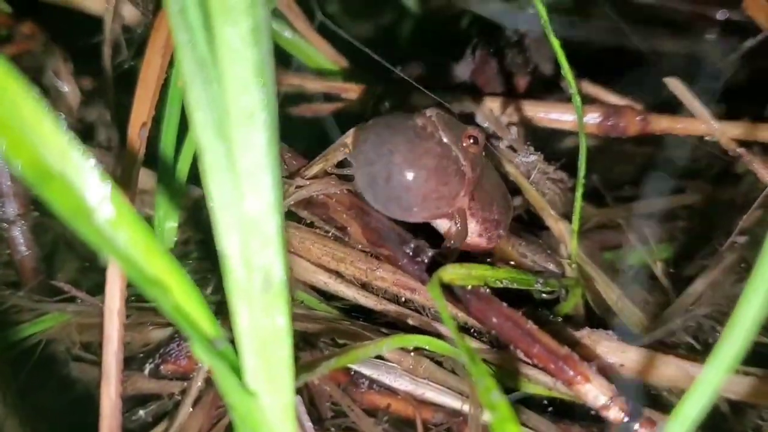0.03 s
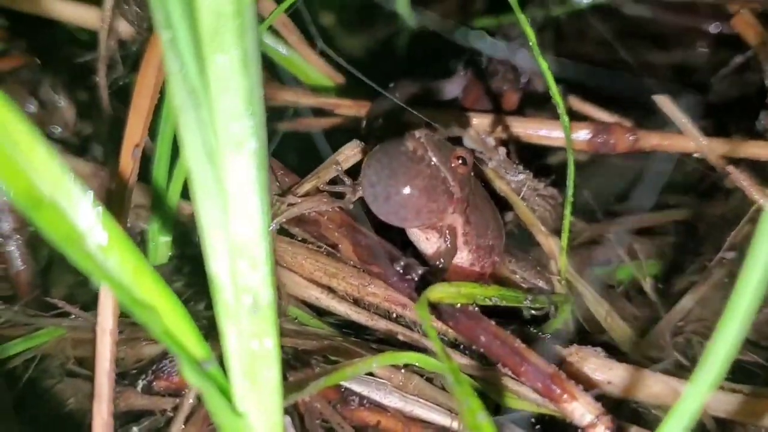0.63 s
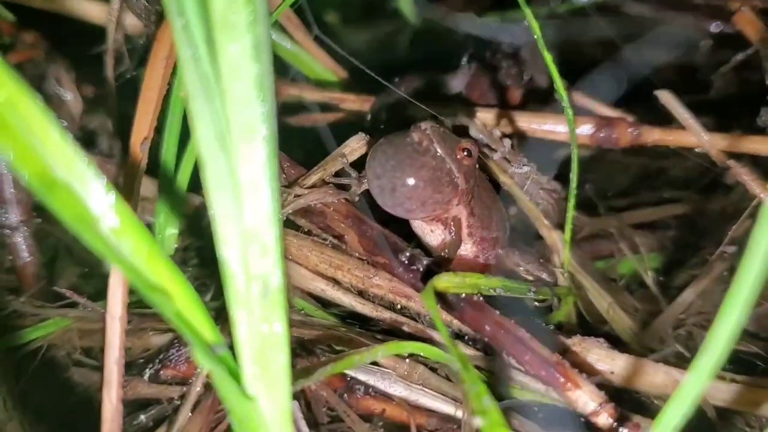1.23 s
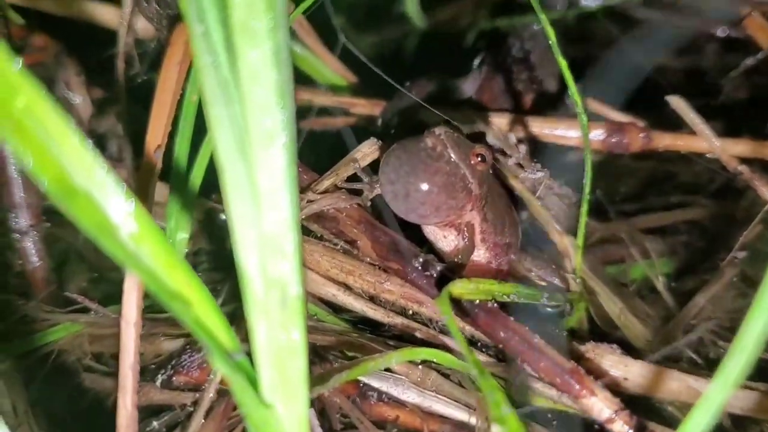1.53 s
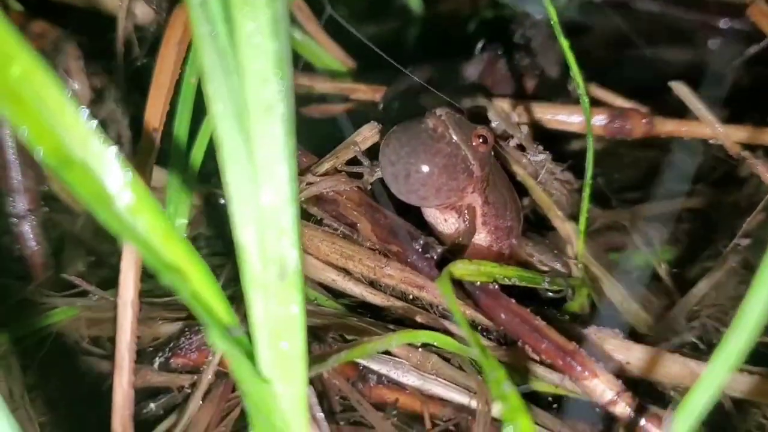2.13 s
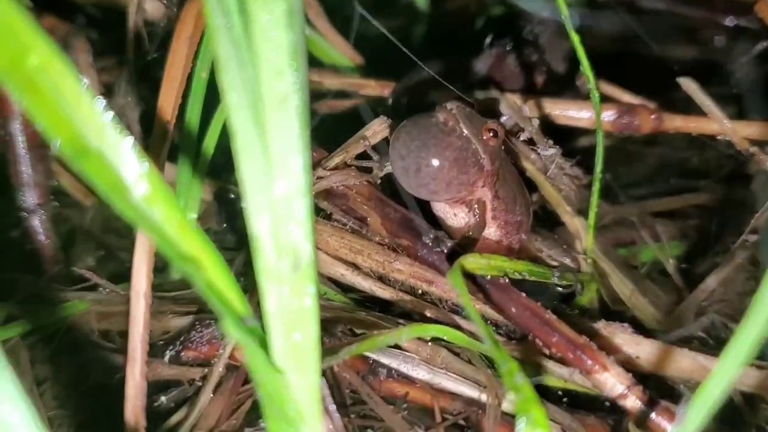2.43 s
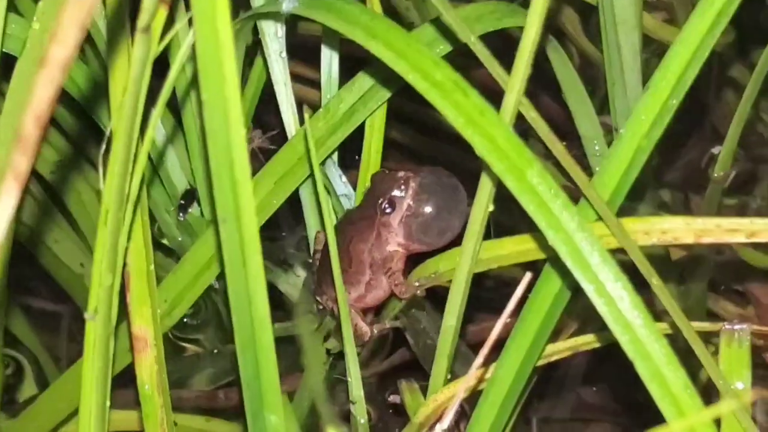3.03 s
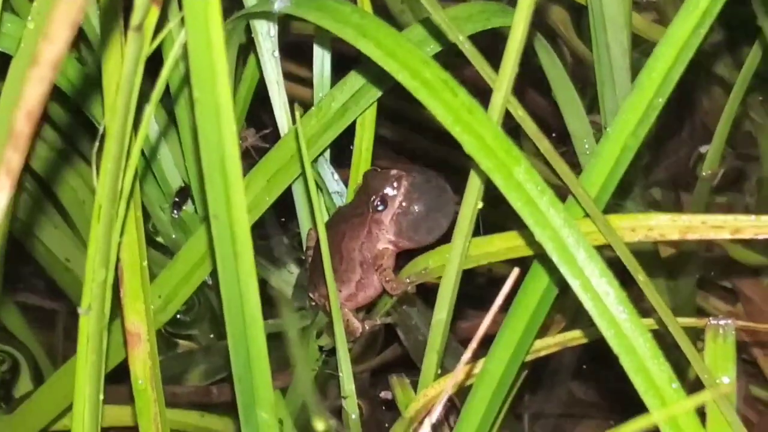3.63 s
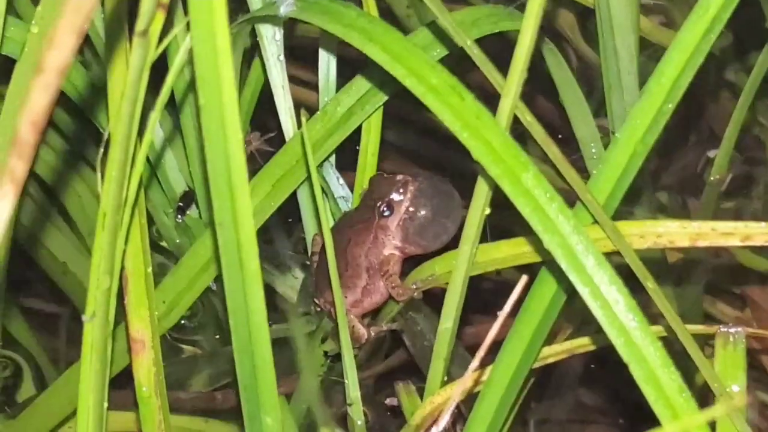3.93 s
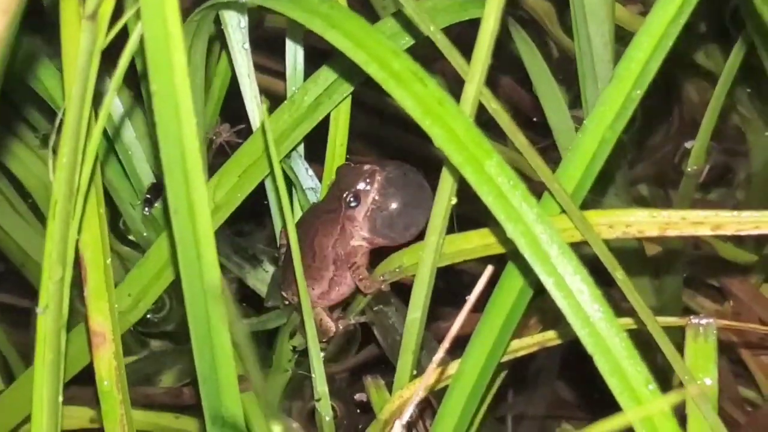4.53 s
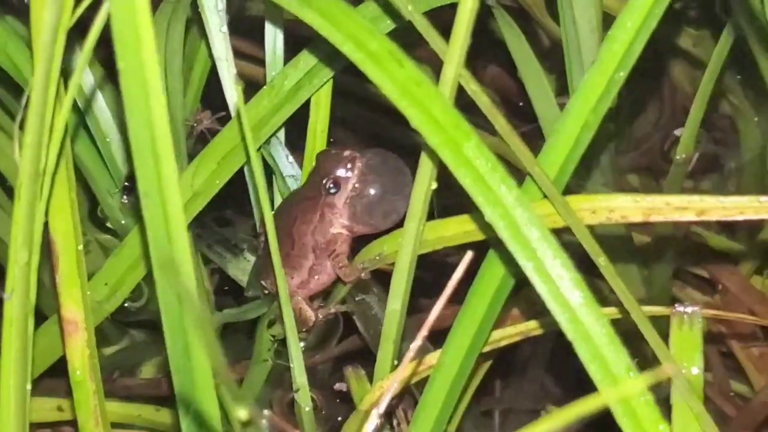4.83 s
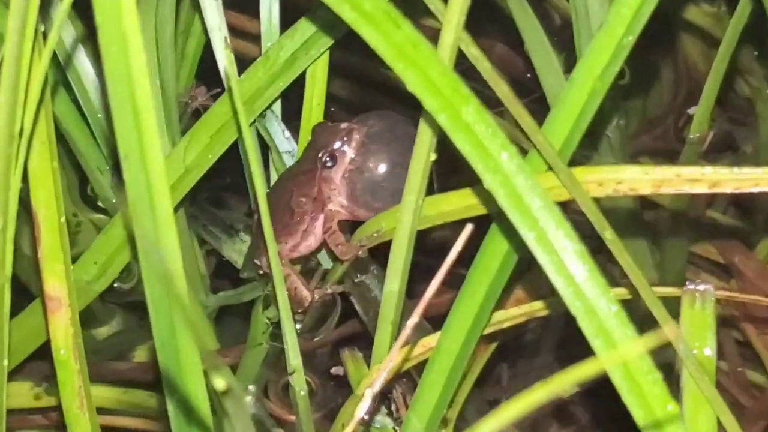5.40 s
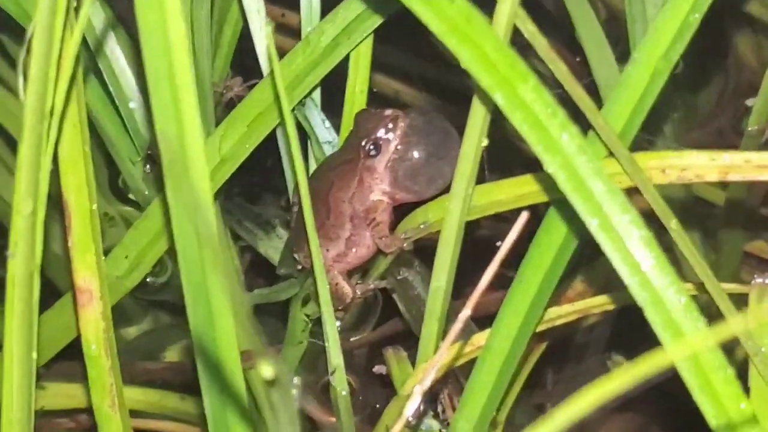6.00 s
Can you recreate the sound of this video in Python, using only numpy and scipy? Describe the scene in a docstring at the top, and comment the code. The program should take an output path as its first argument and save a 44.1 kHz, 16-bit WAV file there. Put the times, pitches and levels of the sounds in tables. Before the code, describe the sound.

Tiny frogs call near the microphone in high, upward-sliding peeps while hundreds more blend into a shrill chorus behind them.

```python
"""A loud rising whistle opens a night chorus of spring peepers in a marsh, heard from two spots in turn
with a brief silence between. Each peep is a vibration of the vocal cords, radiated by the throat sac
as an almost pure tone. Two close frogs overlap and beat; hundreds of distant ones sum to a band near
3 kHz, scattered by reeds and trees. A faint rasp comes and goes, and a hand on the microphone excites
the damped modes of its case, over a low rumble."""
import sys
import numpy as np
from scipy import signal
from scipy.fft import rfft, irfft, next_fast_len
from scipy.io import wavfile
from scipy.ndimage import uniform_filter1d, minimum_filter1d

SR = 44100
rng = np.random.default_rng(int(sys.argv[2]) if len(sys.argv) > 2 else 0)


def to_wav(sig):
    """Store sig (one row per channel, or 1-D mono) as 16-bit WAV at the path in sys.argv[1].

    Samples outside -1..1 are clipped; the rate is SR.
    """
    pcm = np.clip(np.atleast_2d(sig), -1, 1) * 32767
    pcm = np.round(pcm).astype(np.int16)
    wavfile.write(sys.argv[1], SR, pcm.T)  # frames by channels


N = 276066
TIME = np.arange(N) / SR
FIRST_SPOT_END_S, SECOND_SPOT_START_S = 2.767, 2.836


# Close calls: t/s, duration/s, starting f/Hz, rise/Hz, level/dB, left-right/dB, lag of left/ms
NEAR_CALLS = [(0.103, .168, 2850, 307.5, -16.5, 5.5, -.16), (0.613, 0.081, 3175, 217.7, -29.5, 5, -.11),
              (1.469, 0.12, 3184, 228.4, -32, 13, 0.16), (1.638, 0.076, 3188, 216, -22, 8.5, -0.12),
              (1.764, .066, 3182, 193, -30, 12, 0.026), (1.817, 0.19, 2470, 303, -57, 2.5, -0.04),
              (1.943, 0.16, 3294, 254, -38.5, 16, .08), (2.101, 0.13, 3250, 211.3, -39, -2, -0.029),
              (2.22, .11, 3115, 84.5, -27, -1.5, 0.12), (2.443, 0.097, 3185, 217.3, -23.5, 13, 0.2),
              (2.521, .14, 3460, 283, -40.5, -2.5, 0), (2.63, 0.097, 2995, 362, -30.5, 10, 0.026),
              (2.867, 0.14, 3090, 217, -40, 0, 0.46), (3.085, 0.12, 3174, 288.4, -38.5, -14.5, 0.36),
              (3.201, 0.14, 3051, 329, -16.5, -12, 0.39), (3.204, 0.14, 2942, 258.8, -16, -8, .37),
              (3.6, 0.036, 3355, 111, -29.5, -8, 0.42), (3.694, 0.16, 2930, 368, -29, -17, 0.28),
              (4.027, 0.1, 3217, 120, -35, -5, 0.37), (4.201, .15, 3316, 242, -37.5, -6, .41),
              (4.237, 0.092, 2910, 247, -35, -5, .44), (4.357, .144, 3072, 356.4, -16.5, -12, 0.406),
              (4.354, .128, 2958, 223, -16.5, -7, .36), (4.493, .072, 3434, 183.3, -34, -11, 0.49),
              (4.71, .09, 3177, 160.4, -30, -9.5, 0.41), (4.841, 0.18, 2930, 354.4, -29.5, -18, 0.26),
              (5.071, 0.089, 3390, 254.5, -31.5, -7.5, .39), (5.422, .13, 2966, 232, -17, -6, 0.077),
              (5.555, .08, 3260, 160, -36.5, -7, 0.44), (5.628, .11, 3226, 230.4, -26, -5.5, 0.39),
              (5.74, 0.19, 3055, 352.7, -14, -10, .41), (5.939, .17, 2949, 365, -31, -19.5, 0.24),
              (5.961, 0.12, 3334, 335, -32.5, -11, 0.45)]

def near_frogs(close_db=-16, echo_db=-27, echo_growth=.6):
    """Direct-to-reverberant ratio falls with distance: a fainter frog is farther and has more echo."""
    direct, scattered = np.zeros((2, 2, N))
    for s, length, start_hz, rise_hz, level_db, balance_db, lag_ms in NEAR_CALLS:
        far_db = max(close_db - level_db, 0)
        call = from_db(level_db) * panned(balance_db) * peep(s, length, start_hz, rise_hz, far_db, lag_ms)
        add(direct, s, call)
        add(scattered, s, call * from_db(echo_db + echo_growth * far_db))
    sound = direct + marsh_echo(scattered, t60=.24, dull_hz=8950)
    return filtered(sound, 6, 1100, "high")   # the calls carry nothing below about 1 kHz


# Vocal cord partials: f/whistle pitch, level/dB at the first spot, level/dB at the second
CORD_PARTIALS = [(.5, -37, -31.5), (1, 4.5, 3), (1.5, -30.5, -33.5), (2, -38, -34.5), (2.5, -58.5, -50),
                 (3, -59.5, -55.5), (3.5, -49, -52), (4, -46.5, -44), (4.5, -44.5, -43.5), (5, -58, -53)]
# Air pressure through one call: t/duration, level/dB
AIR_PRESSURE = [(0, 1.5), (.12, 4.5), (.45, 3.5), (.75, 3), (1, -3.5)]

def peep(s, length, start_hz, rise_hz, far_db, lag_ms=None, partials=10,
         attack=.0045, release=.001, air_per_db=.5):
    """Airflow drives the cords in a harmonic series; the throat sac radiates mainly the second partial."""
    t = np.arange(int(length * SR)) / SR
    progress = t / length
    blur = 1.5 + far_db / 12.5   # scattering in the grass smooths the edges of a far call
    hz = start_hz + rise_hz * glide(t)
    close = lag_ms is not None   # a close call is stereo and keeps its fine detail
    if close:
        hz = hz * (1 - .42 / blur * np.exp((t - length) / .00073))   # pitch sags as the air runs out
        stereo_phase = np.pi * hz * lag_ms / 1000 * np.array([[1], [-1]])
        phase = phase_of(hz) + cord_rattle(t) / blur - stereo_phase
        tick = from_db(-28.5) / blur * flutter(len(t), 7000) * np.exp(-t / .0075)   # the cords part
    else:
        phase, tick = phase_of(hz), 0
    phase = phase.astype(np.float32)
    tone = 0
    for partial, (offset, slope) in zip(CORD_PARTIALS, rng.standard_normal((partials, 2))):
        ratio, first_db, second_db = partial
        db = first_db if s < FIRST_SPOT_END_S else second_db
        if ratio > 1:   # air and grass take more from the overtones, and unevenly as the pitch moves
            uneven_db = offset / 2 + slope * (2 * progress + .5)
            db = db - air_per_db * far_db * np.sqrt(ratio - 1) + uneven_db
            if close:
                db = db + 2 * flutter(len(t), 170)   # the overtones flicker
        tone = tone + from_db(db) * np.sin(ratio * phase)
    ramps = np.clip(t / (attack * blur), 0, 1) * np.clip((length - t) / (release * blur), 0, 1)
    pressure = from_db(np.interp(progress, *np.transpose(AIR_PRESSURE)))
    return tone * np.sin(np.pi / 2 * ramps) ** 2 * pressure + tick


def glide(t, climb_s=.16):
    """Frequency sweep from 0 to 1: a gentle start, an even climb, and a plateau from climb_s on."""
    climb = np.sin(np.pi / 2 * np.minimum(t / climb_s, 1) ** 1.15)
    return climb / climb[-1]


def cord_rattle(t, start_s=.005, stop_s=.0045):
    """Random phase modulation: the cords rattle as they start and stop, and waver slightly between."""
    roughness = .003 + .13 * np.exp(-t / start_s) + .07 * np.exp((t - t[-1]) / stop_s)
    return roughness * flutter(len(t), 1400) + phase_of(2.6 * flutter(len(t), 290))


# Distant chorus: t/s, level/dB, left-right/dB
CHORUS_LEVEL = [(0, -35.5, 1), (1.42, -33.5, 3.5), (1.5, -28, 3), (2.0, -22.5, 2.5), (2.76, -21, 2),
                (2.84, -30, -8), (3.9, -32.5, -8.5), (5.3, -32, -9.5), (6.26, -29, -7.5)]

def far_frogs(count=480, centre_hz=3065, spread_hz=168, rise_hz=255):
    """Incoherent summation: calls of random pitch, distance and direction merge into one band."""
    out = np.zeros((2, N))
    for s, (pitch, pace, near, side, lag) in zip(call_times(count), traits(count, 5, limit=2.5)):
        call = peep(s, .14 + .02 * pace, centre_hz + spread_hz * pitch, rise_hz * (1 + .121 * pace),
                    far_db=26.5, partials=4, air_per_db=.1)
        gain = from_db(3 * near - 2.4 * pitch ** 2)   # the largest and smallest frogs are faintest
        left, right = gain * panned(3 * side) * call
        add(out[0], s + .0003 * lag, left)
        add(out[1], s, right)
    out += from_db(-7) * marsh_echo(out, t60=1, dull_hz=6860)
    power = uniform_filter1d(out ** 2, size=SR // 6, axis=1)
    out /= np.sqrt(power + 1e-12)   # so many voices keep an even level
    level_db, balance_db = in_time(CHORUS_LEVEL)
    return from_db(level_db) * out * panned(balance_db)


def edge_frogs(count, length, centre_hz, outward_hz, level_db, rise_hz=235):
    """Release from masking: mid-distance calls above or below the chorus band stand out singly."""
    out = np.zeros((2, N))
    for s, (oddness, pace, near, side) in zip(call_times(count), traits(count, 4, limit=2)):
        call = peep(s, length * (1 + .16 * pace), centre_hz + outward_hz * oddness,
                    rise_hz * (1 + .15 * pace), far_db=12, attack=.0072, release=.02, air_per_db=1.1)
        add(out, s, from_db(level_db + 1.5 * near - 2 * oddness) * panned(3 * side) * call)
    out += from_db(-8) * marsh_echo(out, t60=.45, dull_hz=7000)
    chorus_db, balance_db = in_time(CHORUS_LEVEL)
    return from_db(chorus_db) * out * panned(balance_db)


def call_times(count, lead_s=.2):
    """Jittered onsets, one to each equal slot; the first slot opens before the scene does."""
    return (np.arange(count) + rng.random(count)) / count * (N / SR + lead_s) - lead_s


def traits(count, kinds, limit):
    """Individual variation: a row of clipped normal deviates for each frog."""
    return np.clip(rng.standard_normal((count, kinds)), -limit, limit)


def marsh_echo(x, t60, dull_hz):
    """Multiple scattering by reeds and trees gives a dull exponential tail, different on each side."""
    t = np.arange(SR) / SR
    tail = rng.standard_normal((2, SR)) * from_db(-60 * t / t60) * np.minimum(t / .0022, 1)
    tail = filtered(tail, 2, dull_hz)
    tail /= np.sqrt(np.sum(tail ** 2, axis=1, keepdims=True) * SR / 2 / dull_hz)   # unit passband gain
    return signal.fftconvolve(x, tail, axes=1)[:, :N]


# Spectrum of the rasp: f/Hz, relative level/dB
RASP_SPECTRUM = [(900, -29.5), (1300, -16.5), (1900, -7), (2400, 3.5), (3200, -7), (4000, -4), (5000, -7),
                 (5700, -15.5), (7000, -28.5), (15000, -42)]
# Louder spells of the rasp: t/s, duration/s, level/dB
RASP_SPELLS = [(0.54, 0.21, -65), (1.43, 0.22, -59), (2.426, 0.31, -55.5), (2.815, 0.24, -62)]

def rasp(grain_hz=90, fade_s=.048):
    """Amplitude modulation roughens noise: a bed that follows the rumble, and spells with chirps."""
    bed = from_db(in_time(RUMBLE_LEVEL)[0] - 3.5)
    spells = 0
    for s, length, level_db in RASP_SPELLS:
        inside_s = np.minimum(TIME - s, s + length - TIME)
        spells = spells + from_db(level_db) * np.clip(inside_s / fade_s, 0, 1)
    grain = unit_rms(from_db(3 * flutter(N, grain_hz)))
    noise = np.maximum(bed, spells) * grain * coloured_noise(RASP_SPECTRUM, correlation=.3)
    _, chorus_balance_db = in_time(CHORUS_LEVEL)
    return (noise + spells * from_db(-8.5) * chirps()) * panned(chorus_balance_db)


def chirps(centre_hz=2200, wander_hz=70, flicker_hz=25):
    """Random gating breaks a wandering tone into notes a few hundredths of a second long."""
    hz = centre_hz + wander_hz * flutter(N, flicker_hz)
    notes = np.clip(flutter(N, flicker_hz), 0, 1) ** 2
    return unit_rms(notes * np.sin(phase_of(hz)))


# Shifts of the hand's grip: t/s, duration/s, peak level before filtering/dB, left-right/dB
GRIP_SHIFTS = [(0.177, 0.03, -62.5, -14), (1.13, 0.017, -55, -26), (1.895, .05, -44, -28),
               (2.343, 0.096, -39, -26), (2.56, 0.027, -45, -34), (2.634, .08, -42.5, -39),
               (5.154, .02, -45, 10), (6.079, .02, -55, 13)]
# Modes of the microphone case: f/Hz, T60/s, relative level/dB
CASE_MODES = [(76, 0.076, -8), (147, 0.024, -8.5), (243, 0.015, -3), (403, 0.0074, -13.5),
              (790, 0.0034, -11)]

def hand_bumps(contact_s=.004, gap_s=.028, fade_db_per_s=60):
    """Modal excitation: each shift is a run of ever lighter rubs that set the case thudding."""
    out = np.zeros((2, N))
    t = np.arange(SR // 8) / SR
    for s, length, peak_db, balance_db in GRIP_SHIFTS:
        for delay in np.arange(0, length, gap_s):
            ring = sum(from_db(db + 2 * rng.standard_normal() - 60 * t / t60) * np.sin(2 * np.pi * hz * t)
                       for hz, t60, db in CASE_MODES)
            rub = rng.standard_normal(len(t)) * np.exp(-t / contact_s)
            thud = signal.fftconvolve(ring, rub)
            gain = from_db(peak_db - fade_db_per_s * delay) * panned(balance_db)
            add(out, s + delay, gain * thud / np.abs(thud).max())
    return filtered(out + 1e-18, 2, [55, 900], "band")   # soft skin passes little treble


# Spectra of the rumble at each spot, and of the hiss: f/Hz, relative level/dB
FIRST_SPOT_SPECTRUM = [(24, -37), (40, -10), (84, -0.5), (134, -6.5), (162, -3.5), (210, -11.5),
                       (390, -21.5), (724, -21), (1000, -29), (1300, -61), (2200, -120)]
SECOND_SPOT_SPECTRUM = [(24, -35), (40, -6.5), (91, 2.5), (105, 0.5), (134, -13), (257, -14.5),
                        (298, -15.5), (470, -26), (633, -20), (795, -19), (1000, -25), (1300, -57.5),
                        (2200, -120)]
HISS_SPECTRUM = [(1000, -3.5), (4000, 1), (9000, -1.5), (13000, -2.5), (15800, -4)]
# Rumble, swelling at the first spot and nearly steady at the second: t/s, level/dB
RUMBLE_LEVEL = [(0, -84.5), (1.3, -84), (1.9, -68), (2.76, -65.5), (2.85, -71), (4.5, -66.5), (6.26, -68)]

def rumble():
    """Ambient noise floor: a low spectrum for each spot, and a faint hiss under the same envelope."""
    first = coloured_noise(FIRST_SPOT_SPECTRUM, correlation=.4)
    second = coloured_noise(SECOND_SPOT_SPECTRUM, correlation=.11)
    low = filtered(np.where(TIME < FIRST_SPOT_END_S, first, second), 4, 42, "high")
    hiss = from_db(-10) * coloured_noise(HISS_SPECTRUM, correlation=0)
    return from_db(in_time(RUMBLE_LEVEL)[0]) * (low + hiss)


def coloured_noise(spectrum, correlation):
    """Spectral shaping of white noise, rms 1; the mid-to-side ratio sets the left-right correlation."""
    hz, db = np.transpose(spectrum)
    size = next_fast_len(N)
    log_hz = np.log(np.fft.rfftfreq(size, 1 / SR) + 1)
    gain = from_db(np.interp(log_hz, np.log(hz), db, right=-100))
    mid, side = irfft(rfft(rng.standard_normal((2, size))) * gain, size)[:, :N]
    return unit_rms(np.sqrt(1 + correlation) * mid + np.sqrt(1 - correlation) * side * np.array([[1], [-1]]))


def flutter(size, hz):
    """Band-limited random fluctuation up to the given rate, rms 1."""
    return unit_rms(filtered(rng.standard_normal(size + 400), 4, hz)[400:])


def filtered(x, order, hz, kind="low"):
    """Maximally flat filtering."""
    return signal.sosfilt(signal.butter(order, hz, kind, fs=SR, output="sos"), x)


def phase_of(hz):
    """Phase is the time integral of frequency."""
    return 2 * np.pi * np.cumsum(hz) / SR


def from_db(db):
    """Level to amplitude ratio."""
    return 10 ** (np.asarray(db) / 20)


def unit_rms(x):
    """Normalisation to unit power."""
    return x / np.sqrt(np.mean(x ** 2) + 1e-20)


def in_time(rows):
    """Linear interpolation of each column at every sample."""
    s, *columns = np.transpose(rows)
    return [np.interp(TIME, s, column) for column in columns]


def panned(balance_db):
    """Constant-power panning: left and right gains for a level difference."""
    gains = from_db(np.array([[.5], [-.5]]) * balance_db)
    return gains / np.sqrt(np.mean(gains ** 2, axis=0))


def add(out, s, sound):
    """Superposition of a sound from time s on."""
    at = round(s * SR)
    first, last = max(at, 0), min(at + sound.shape[-1], N)
    if last > first:
        out[..., first:last] += sound[..., first - at:last - at]


def scene():
    """Sound pressures add: frogs near and far over the low background."""
    small_frogs = edge_frogs(count=38, length=.115, centre_hz=3385, outward_hz=65, level_db=-17.5)
    large_frogs = edge_frogs(count=17, length=.24, centre_hz=2770, outward_hz=-68.5, level_db=-24)
    return near_frogs() + far_frogs() + small_frogs + large_frogs + rasp() + hand_bumps() + rumble()


def record(dry, ceiling=.97, cutoff_hz=15800):
    """Peak limiting, a gate that silences the gap between the two spots, and a steep low-pass."""
    headroom = np.minimum(1, ceiling / (np.abs(dry).max(axis=0) + 1e-9))
    limited = dry * uniform_filter1d(minimum_filter1d(headroom, size=1201), size=601)
    gate = (TIME < FIRST_SPOT_END_S) + np.clip((TIME - SECOND_SPOT_START_S) / .0075, 0, 1)
    return signal.sosfilt(signal.ellip(10, .1, 80, cutoff_hz, fs=SR, output="sos"), limited * gate)


dry = scene()
out = record(dry)
to_wav(out)
```